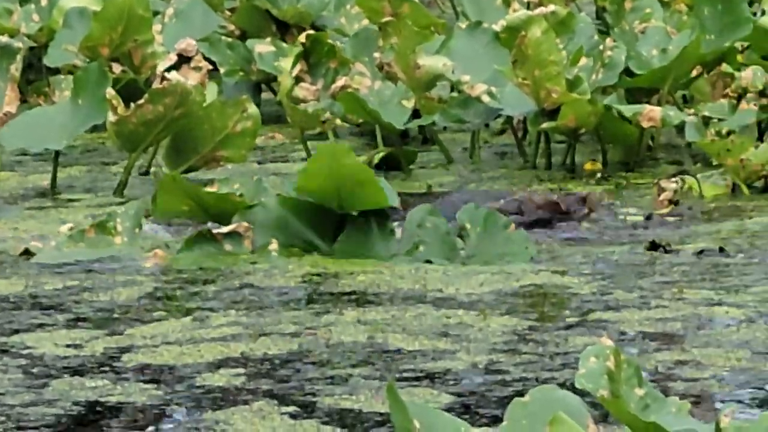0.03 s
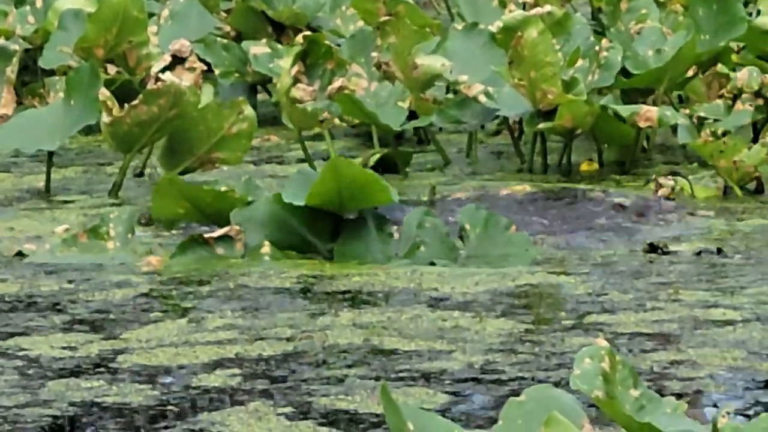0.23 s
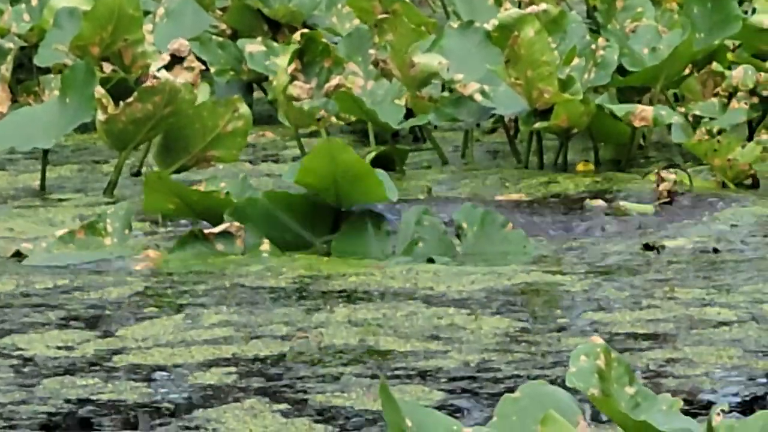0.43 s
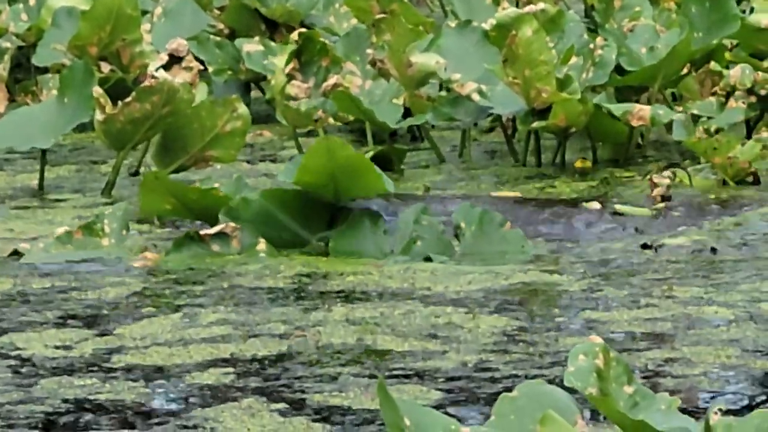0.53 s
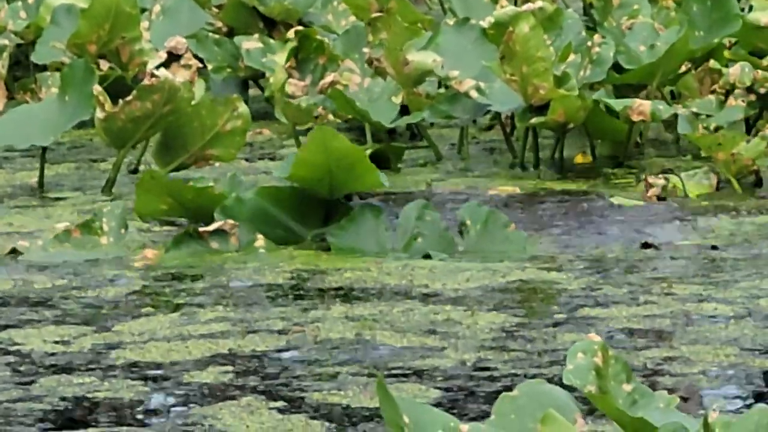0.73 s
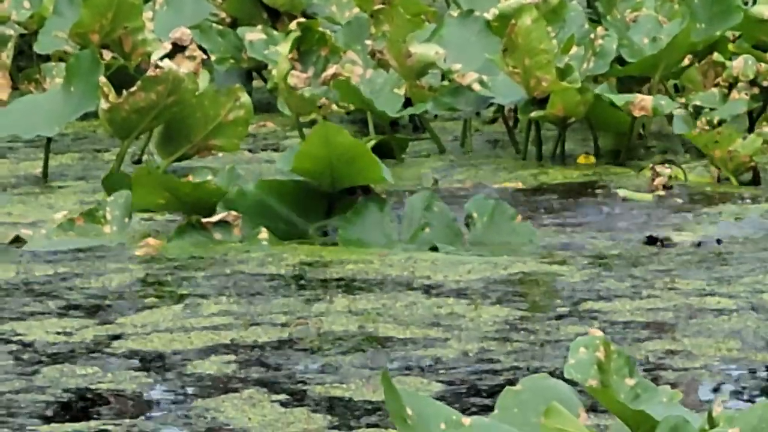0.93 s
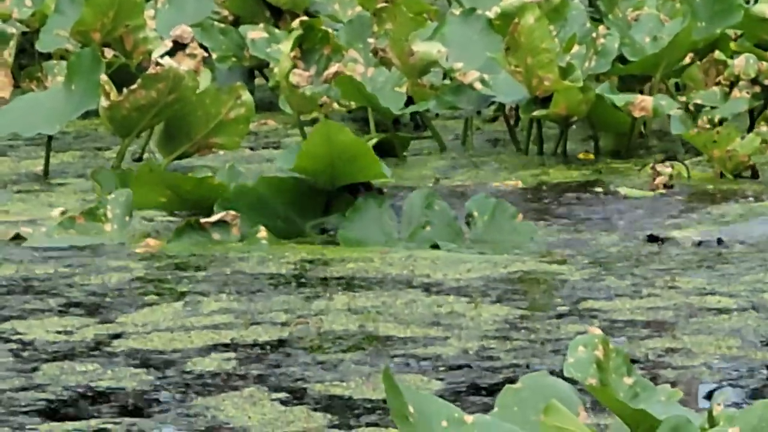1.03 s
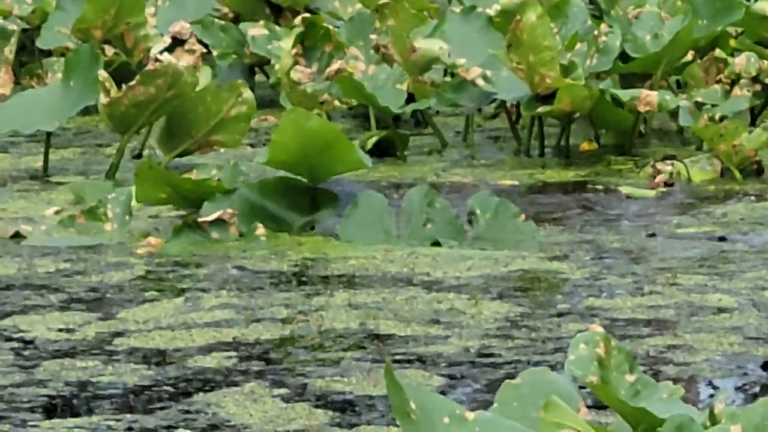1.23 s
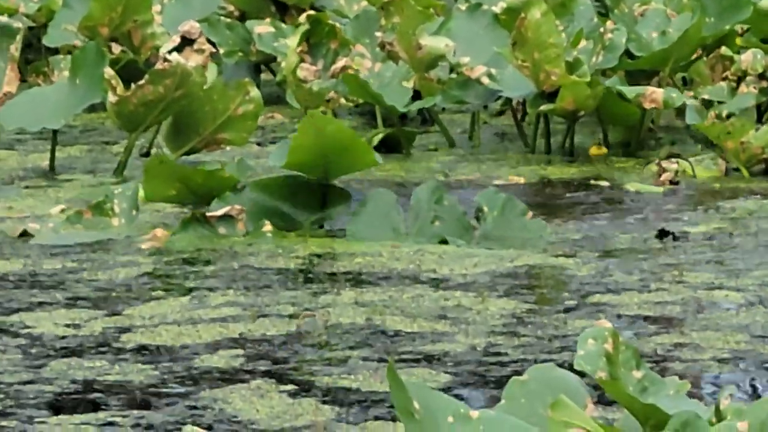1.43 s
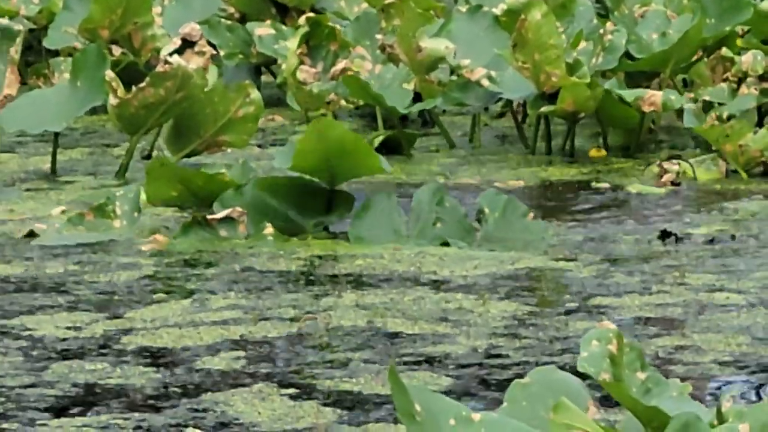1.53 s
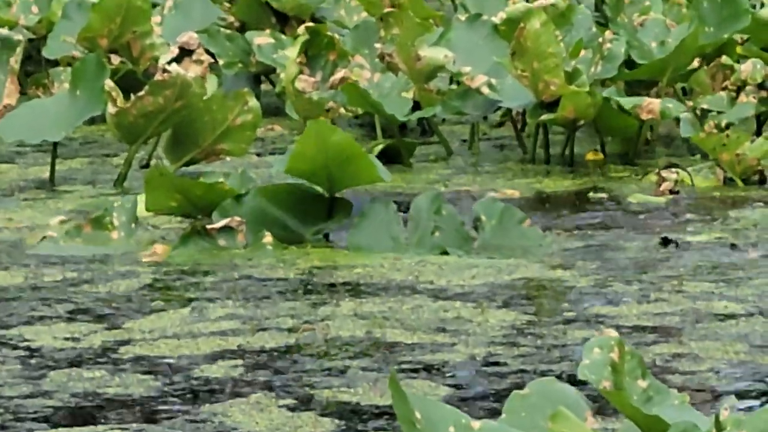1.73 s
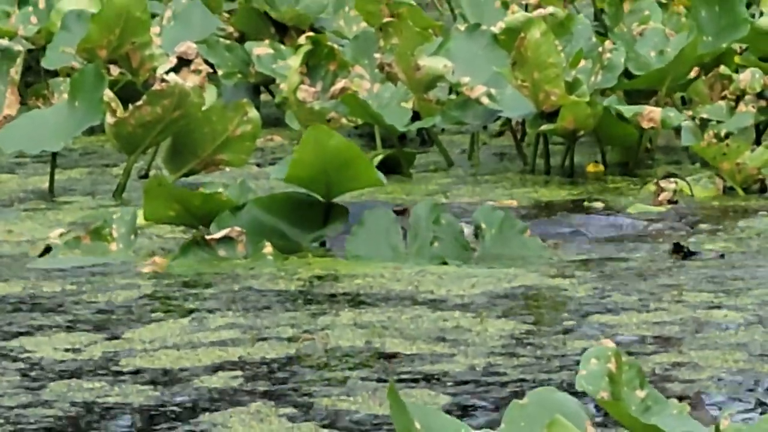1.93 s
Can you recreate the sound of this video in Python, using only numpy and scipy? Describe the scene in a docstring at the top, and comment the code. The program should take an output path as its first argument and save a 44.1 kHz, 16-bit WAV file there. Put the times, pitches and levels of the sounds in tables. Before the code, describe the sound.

A short bubbling slosh of pond water opens, with one sharp plop at 0.2 seconds, fading by 0.7 and leaving a few drips. From 0.5 seconds songbirds repeat short high whistles with a light echo. Wind rumbles on the microphone, peaking in a gust around 1.1 to 1.2 seconds, as faint distant hoots begin. One close bird chirps just before 2 seconds. A steady marsh hush lies underneath.

```python
"""An animal slips under a marshy pond in front of the microphone: a short slosh of ringing bubbles,
one sharp plop as the cavity closes, a few late drips. Songbirds whistle from the trees around the
water, which echo them; one chirps close by, and something hoots faintly far away.
A breeze buffets the microphone's two ports and peaks in one gust, over the steady hush of the marsh."""
import sys
import numpy as np
from scipy import signal
from scipy.fft import rfft, irfft
from scipy.io import wavfile
from scipy.ndimage import uniform_filter1d

SR = 44100
rng = np.random.default_rng(int(sys.argv[2]) if len(sys.argv) > 2 else 0)


def file_out(sig):
    """Save sig as 16-bit WAV at sys.argv[1]."""
    # one column per channel
    cols = np.atleast_2d(sig).T
    # limit, then scale
    lim = np.clip(cols, -1, 1)
    pcm = np.round(lim * 32767).astype(np.int16)
    wavfile.write(sys.argv[1], SR, pcm)


N = 88200
T = np.arange(N) / SR
HZ = np.fft.rfftfreq(N, 1 / SR)
SIDES = np.array([[.5], [-.5]])  # half of a left-right difference to each channel

# churning of the water over the dive: t/s, level/dB
CHURN = [(0, -50), (.08, -55.5), (.125, -50.5), (.19, -51.5), (.225, -52), (.29, -66), (.39, -64.5),
         (.435, -58), (.48, -64.5), (.58, -65.5), (.7, -76), (2, -75.5)]
# tone colour of the slosh: f/Hz, gain/dB
SLOSH_COLOUR = [(150, -12.5), (400, -12.5), (520, -16), (740, -6.5), (1000, -5.5), (1400, -7.5),
                (1950, -3.5), (2450, -18.5), (2750, -13), (3200, -22), (3660, -12), (4000, -15.5),
                (4450, -10), (5100, -20), (8200, -22.5), (10000, -31), (15000, -38.5)]

def slosh(pitches=48, bubbles_per_s=9000, spread_db=2.5, decay_cycles=4.4):
    """In front of the microphone, a swarm of tiny short-lived bubbles fades as the water closes."""
    swarm, t = np.zeros(N), T[:2048]
    for hz in np.geomspace(250, 14500, pitches):
        strength = amp(spread_db * np.minimum(rng.exponential(1, N), 4))
        births = rng.random(N) < bubbles_per_s / pitches / SR
        cycles = hz * rng.uniform(0.964, 1.071) * t
        ring = np.sin(2 * np.pi * cycles) * np.exp(-cycles / decay_cycles) * (1 - np.exp(-2 * cycles))
        swarm += signal.oaconvolve(strength * births, ring * hz)[:N]
    coloured = irfft(rfft(swarm) * amp(at_hz(SLOSH_COLOUR, HZ)), N)
    return unit_rms(coloured) * amp(curve(CHURN))


# large bubbles; the three from 0.20 to 0.21 s are the plop of the closing cavity:
# t/s, level/dB, f/Hz, ring to -60 dB/s (capped at max_cycles; a negative ring is silent)
BUBBLES = [(.049, -45, 955, 5.5), (.095, -38, 1650, -0.5), (.112, -40, 730, 0.3), (.117, -48, 3620, .025),
           (.121, -45.5, 1340, .04), (.16, -38, 1160, -0.7), (.17, -50, 3640, .025),
           (.2035, -24, 1820, .019), (.2062, -36, 4300, .014), (.2096, -26, 1320, .018),
           (0.211, -37.5, 1135, 0.1), (.257, -50, 2720, 8), (.333, -52, 3700, .025), (.338, -53, 1940, .04),
           (.372, -46, 785, .07), (.408, -50, 1020, .03), (.428, -45, 1720, .04), (0.577, -47.5, 1930, 0.5),
           (.615, -56.5, 3190, 2), (1.32, -57, 1720, 5)]

def bubbles(rise=0.055, max_cycles=85):
    """Each large bubble rings and rises in pitch as it nears the surface."""
    out = np.zeros(N)
    for start, db, hz, ring_s in BUBBLES:
        ring_s = min(ring_s, max_cycles / hz)
        t = np.arange(0, ring_s, 1 / SR)
        cycles = np.cumsum(hz * (1 + rise * t / ring_s)) / SR
        envelope = amp(db - 60 * t / ring_s) * (1 - np.exp(-cycles))
        add(out, start, envelope * np.sin(2 * np.pi * cycles))
    return out


# wet slaps on the pond's surface: t/s, level/dB, f/Hz, width/Hz, decay/s
SLAPS = [(0.2033, -43.5, 2390, 2600, 0.0068), (0.427, -67.5, 11000, 6000, 0.055),
         (0.445, -48.5, 4300, 700, 0.0078), (.94, -61, 5500, 2500, .025), (1.093, -52, 1200, 700, 0.0072),
         (1.098, -61, 5200, 2200, .014)]

def slaps():
    """Water hits water in short bursts as the cavity snaps shut and wavelets meet."""
    out, t = np.zeros(N), T[:8192]
    for start, db, hz, width_hz, decay_s in SLAPS:
        add(out, start, amp(db) * noise_band(hz, width_hz)[:len(t)] * np.exp(-t / decay_s))
    return out


# drips on leaves by the water: t/s, relative level/dB
DRIPS = [(.109, -53), (0.144, -63), (.174, -60), (0.406, -51.5), (0.429, -46), (0.709, -48), (1.108, -53),
         (1.283, -53)]

def drips(gain_db=-7, attack_s=0.00058, decay_s=.0045):
    """Each small drop bursts on a leaf in a bright tick."""
    out, t = np.zeros(N), T[:2048]
    envelope = np.minimum(t / attack_s, 1) * np.exp(-t / decay_s)
    for start, db in DRIPS:
        add(out, start, amp(db + gain_db) * noise_band(hz=7830, width_hz=2000)[:len(t)] * envelope)
    return out


def near_chirp(start=1.95, length=.055, level_db=-38, from_hz=3210, to_hz=2413):
    """A bird close to the microphone gives one quick downward slur with a faint octave."""
    out, t = np.zeros(N), np.arange(0, length, 1 / SR)
    hz = to_hz + (from_hz - to_hz) * (1 - t / length) ** 1.68
    phase = 2 * np.pi * np.cumsum(hz) / SR
    tone = np.sqrt(2) * (np.sin(phase) + amp(-40) * np.sin(2 * phase))
    peak_s, width_s = 0.023, 0.0088
    swell = fade(t, length, edge_s=0.0019) / (1 + ((t - peak_s) / width_s) ** 2) ** 1.2
    add(out, start, amp(level_db) * swell * tone)
    return out


# whistled notes from the trees: t/s, length/s, level/dB, start f/Hz, end f/Hz
WHISTLES = [(0.487, .07, -59, 4390, 4373), (.58, 0.061, -70.5, 7420, 7250), (0.624, .045, -64, 4360, 4340),
            (.76, 0.04, -82, 7550, 7300), (0.837, 0.064, -56.5, 4277, 4343), (.91, 0.037, -69, 7110, 7270),
            (0.942, 0.061, -61.5, 4316, 4360), (.96, 0.089, -73, 7300, 7360),
            (1.035, 0.059, -55, 4308, 4348), (1.135, 0.023, -61.5, 7280, 7280),
            (1.185, 0.12, -71.5, 7350, 7280), (1.189, .055, -53, 4290, 4320),
            (1.296, 0.044, -57.5, 4330, 4200), (1.336, 0.0524, -52.5, 4382, 4300),
            (1.401, 0.053, -67, 7280, 7140), (1.467, 0.058, -47.5, 4287, 4270),
            (1.475, .05, -75, 7170, 7300), (1.539, 0.048, -68.5, 7270, 7030),
            (1.575, 0.09, -85, 4300, 4240), (1.657, 0.06, -58, 4300, 4240), (1.815, 0.019, -71, 3590, 3640),
            (1.84, 0.13, -55.5, 3563, 3557), (1.89, 0.053, -71.5, 7100, 7260),
            (1.925, 0.034, -51, 3620, 3770), (1.968, 0.024, -52.5, 3590, 3510)]

def whistles(waver=0.0046, edge_s=0.014):
    """Songbirds around the pond whistle nearly pure, slightly wavering notes."""
    out = np.zeros(N)
    for start, length, db, from_hz, to_hz in WHISTLES:
        t = np.arange(0, length, 1 / SR)
        glide = from_hz + (to_hz - from_hz) * t / length
        hz = glide * (1 + waver * noise_band(hz=0, width_hz=68)[:len(t)])
        tone = np.sqrt(2) * np.sin(2 * np.pi * np.cumsum(hz) / SR)
        add(out, start, amp(db) * fade(t, length, min(edge_s, length / 2)) * tone)
    return out


# buzzy calls, soft chip notes and hollow hoots: t/s, length/s, level/dB, f/Hz, width/Hz
BUZZES = [(1.105, .08, -65, 1940, 260), (1.13, .14, -80, 9450, 450), (1.21, 0.26, -71.5, 3710, 333),
          (1.22, 0.26, -66.5, 2230, 900), (1.42, 0.2, -69.5, 2397, 101.9), (1.54, 0.12, -66.5, 2180, 129.6),
          (1.61, 0.12, -69, 7130, 635), (1.82, .16, -67, 3780, 470)]
CHIPS = [(.825, 0.017, -67.5, 6380, 400), (1.04, 0.017, -69, 6330, 400), (1.33, 0.014, -68, 6180, 400),
         (1.461, 0.013, -65.5, 6460, 450)]
HOOTS = [(1.1, 0.076, -57.5, 530, 125), (1.17, .15, -50, 349, 89.5), (1.32, .17, -52, 418, 76),
         (1.46, .12, -56, 395, 110), (1.6, 0.35, -62.5, 218, 67)]

def distant_calls(calls, edge_s):
    """Calls from far off reach the microphone blurred into narrow bands of noise."""
    out = np.zeros(N)
    for start, length, db, hz, width_hz in calls:
        t = np.arange(0, length, 1 / SR)
        voice = unit_rms(noise_band(hz, width_hz)[:len(t)])
        add(out, start, amp(db) * fade(t, length, edge_s) * voice)
    return out


# gusts on the microphone: t/s, relative level/dB, left minus right/dB
GUSTS = [(0, -49, -14), (.07, -69, -6), (.25, -47.5, -14), (.31, -58, -6), (.38, -42, -7), (.5, -43, -11),
         (.64, -37.5, -10), (.7, -40, -6), (.76, -39, -16.5), (.87, -33, -8.5), (.92, -43.5, -18),
         (1.02, -40, -6.5), (1.08, -30, -17.5), (1.14, -30, -7), (1.21, -29, 9.5), (1.25, -35.5, 8),
         (1.39, -45, 0), (1.46, -39.5, -7), (1.54, -48.5, 0), (1.78, -75, -4), (1.83, -59, 2), (2, -56, -3)]
# tone colour of the buffeting: f/Hz, gain/dB
BUFFET_COLOUR = [(15, -8.5), (28, 0), (42, 1), (58, 6), (76, 3.5), (96, -11), (112, -8.5), (145, -17),
                 (216, -23.5), (300, -31)]

def wind(gain_db=1, fall_db_per_octave=-18.5, fall_from_hz=300, low_cut_hz=18):
    """Turbulence right at the microphone's two ports rumbles with the gusts."""
    colour_db = at_hz(BUFFET_COLOUR, HZ) + fall_db_per_octave * np.log2(np.maximum(HZ / fall_from_hz, 1))
    low_cut = HZ ** 2 / (HZ ** 2 + low_cut_hz ** 2)
    rumble = irfft(stereo_spectra(likeness=0.37) * amp(colour_db) * low_cut, N)
    # held level, so that the gusts set the loudness
    rumble /= np.sqrt(uniform_filter1d(rumble ** 2, size=3000, axis=1) + 1e-20)
    balance = amp(SIDES * curve(GUSTS, column=2))
    return rumble * balance / balance.mean(0) * amp(curve(GUSTS) + gain_db)


# single eddies on the microphone: t/s, peak level/dB, f/Hz, half-length/s
EDDIES = [(0.694, -30, 58, 0.017), (1.097, -26.5, 115, 0.02), (1.213, -20, 58, 0.011)]

def eddies():
    """The strongest eddies thump the microphone with a short swing of pressure."""
    return sum(amp(db) * np.exp(-((T - peak_s) / half_s) ** 2) * np.cos(2 * np.pi * hz * (T - peak_s))
               for peak_s, db, hz, half_s in EDDIES)


# echo of the trees around the pond: f/Hz, decay to -60 dB/s
TREE_DECAY = [(200, 1), (2000, 0.32), (4300, 0.64), (9000, 0.78)]

def tree_echo(sound, build_s=0.029):
    """The trees on the banks return a diffuse echo, each band dying at its own speed."""
    hz, t, bands = signal.stft(irfft(stereo_spectra(likeness=0.13), N), SR, nperseg=256)
    decay = amp(-60 * t / at_hz(TREE_DECAY, hz)[:, None])
    _, tail = signal.istft(bands * decay * np.minimum(t / build_s, 1), SR, nperseg=256)
    return signal.fftconvolve(sound[None], tail / np.linalg.norm(tail[0]), axes=1)[:, :N]


# tone colour of the marsh air: f/Hz, gain/dB
AIR_COLOUR = [(15, -41.5), (25, -13.5), (55, -4.5), (82, 2), (126, -15.5), (253, -11), (410, -25),
              (782, -22.5), (1490, -32.5), (1950, -33), (2420, -36), (4040, -36), (4380, -32), (4750, -39),
              (6920, -46), (7500, -42.5), (8580, -58), (12800, -50.5), (15500, -51.5)]
# how alike the air sounds at the two ports: f/Hz, likeness (0 to 1)
AIR_LIKENESS = [(50, 0.65), (300, 0.86), (800, 0.41), (1500, 0.13), (5000, 0.14), (12000, .05)]

def marsh_air(level_db=-50):
    """The steady hush of the marsh, all around the microphone."""
    spectra = stereo_spectra(at_hz(AIR_LIKENESS, HZ)) * amp(at_hz(AIR_COLOUR, HZ))
    return amp(level_db) * unit_rms(irfft(spectra, N))


# scattering between the microphone's ports: f/Hz, phase spread/rad
PORT_SCATTER = [(200, .3), (700, 0.21), (1500, 1.2), (3000, 0.64), (4400, 1.04), (7000, 1.7), (15000, 1)]
# balance between the ports: f/Hz, left minus right/dB
PORT_BALANCE = [(1000, 0.5), (2400, 1), (4400, 0.5), (7300, -1.5), (8500, 9), (11000, 6), (14000, -1)]

def microphone_ports(sound, step_hz=220):
    """Leaves and the camera body scatter the treble differently to the left and right port."""
    wobble = np.interp(HZ / step_hz, np.arange(N), rng.standard_normal(N))
    phase_shift = np.exp(2j * SIDES * wobble * at_hz(PORT_SCATTER, HZ))
    return irfft(rfft(sound) * phase_shift * amp(SIDES * at_hz(PORT_BALANCE, HZ)), N)


def amp(db):
    """Decibels to gain."""
    return 10 ** (np.asarray(db) / 20)


def unit_rms(x):
    """Scales to rms 1."""
    return x / np.sqrt(np.mean(x ** 2) + 1e-20)


def at_hz(points, hz):
    """Reads a table on a log-frequency axis."""
    f, value = np.transpose(points)
    return np.interp(np.log(hz + 1), np.log(f + 1), value)


def curve(rows, column=1):
    """One column of a timed table at every sample."""
    rows = np.array(rows)
    return np.interp(T, rows[:, 0], rows[:, column])


def add(mix, start, sound):
    """Adds a sound at its time."""
    part = mix[max(round(start * SR), 0):][:len(sound)]
    part += sound[:len(part)]


def stereo_spectra(likeness):
    """Spectra of two white noises with a given correlation."""
    left, other = rfft(rng.standard_normal((2, N)))
    return np.array([left, likeness * left + np.sqrt(1 - likeness ** 2) * other])


def noise_band(hz, width_hz):
    """Noise in one steep resonance, 12 dB down at width_hz either side."""
    return unit_rms(irfft(rfft(rng.standard_normal(N)) / (1 + ((HZ - hz) / width_hz) ** 2) ** 2, N))


def fade(t, length, edge_s):
    """Smooth attack, hold and release."""
    return np.sin(np.pi / 2 * np.clip(np.minimum(t, length - t) / edge_s, 0, 1)) ** 2


def scene():
    """Water in front, birds in the trees, hoots far off, wind on the microphone, air all around."""
    water = slosh() + bubbles() + slaps() + drips()
    birds = whistles() + distant_calls(BUZZES, edge_s=0.021) + distant_calls(CHIPS, edge_s=0.0047)
    chirp = near_chirp()
    hoots = distant_calls(HOOTS, edge_s=0.03)
    echo = tree_echo(amp(-17.5) * water + amp(-2.5) * birds + amp(-3) * chirp + amp(-6.5) * hoots)
    direct = microphone_ports(water + birds + chirp + hoots)
    return direct + echo + wind() + eddies() + marsh_air()


def record(dry):
    """The recorder cuts the treble steeply at its band limit."""
    low_pass = signal.firwin(511, cutoff=15760, window=("kaiser", 9), fs=SR)
    return signal.oaconvolve(dry, low_pass[None], "same")


dry = scene()
out = record(dry)
file_out(out)
```